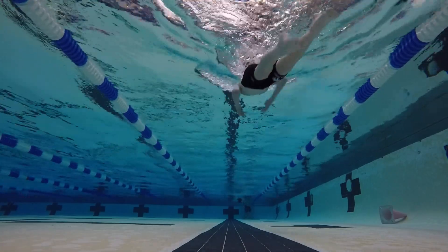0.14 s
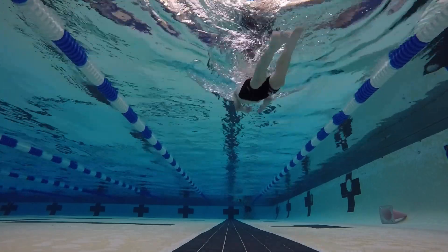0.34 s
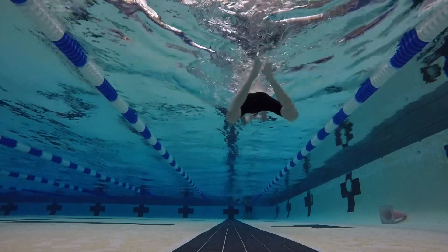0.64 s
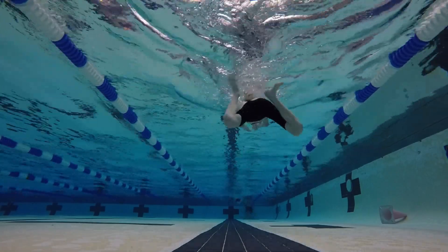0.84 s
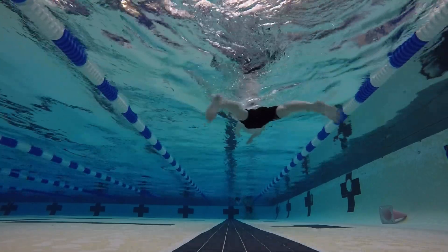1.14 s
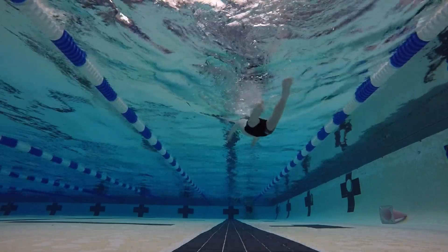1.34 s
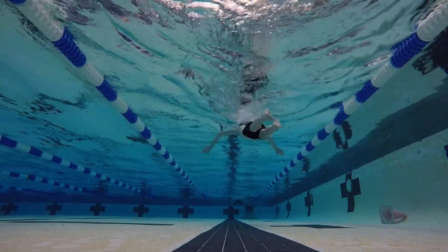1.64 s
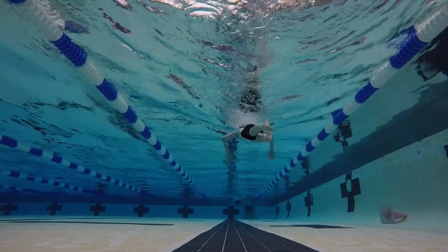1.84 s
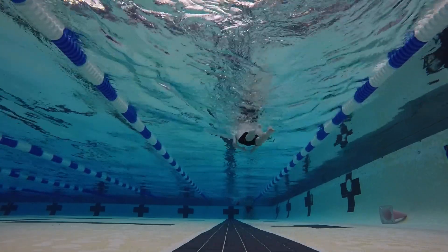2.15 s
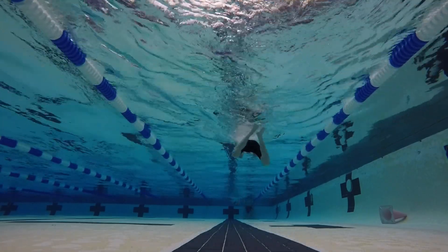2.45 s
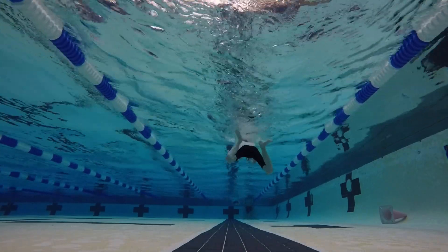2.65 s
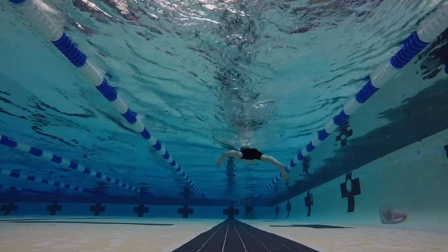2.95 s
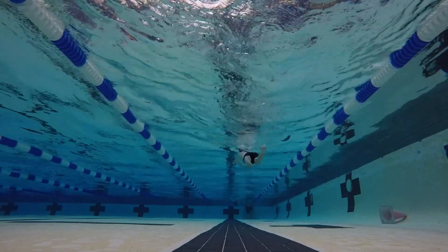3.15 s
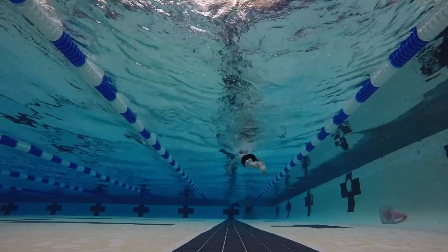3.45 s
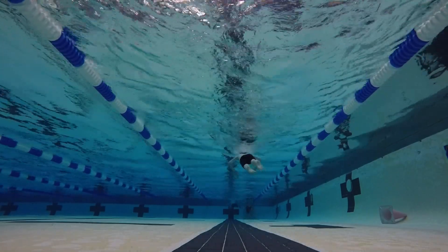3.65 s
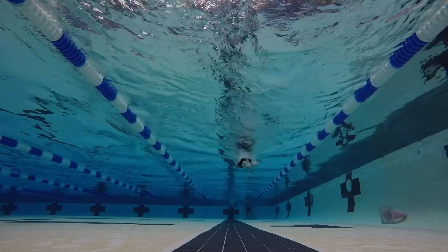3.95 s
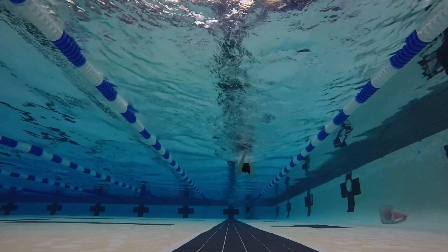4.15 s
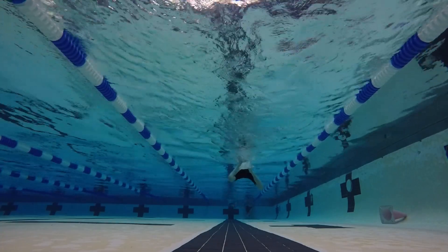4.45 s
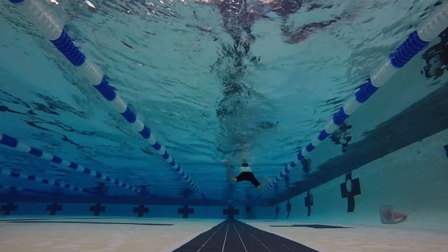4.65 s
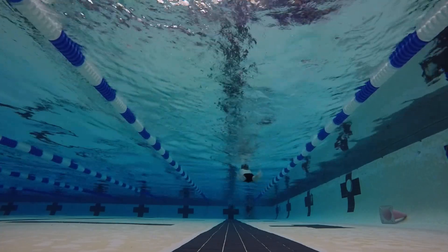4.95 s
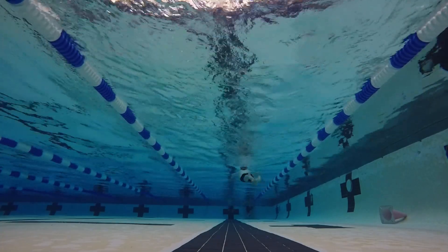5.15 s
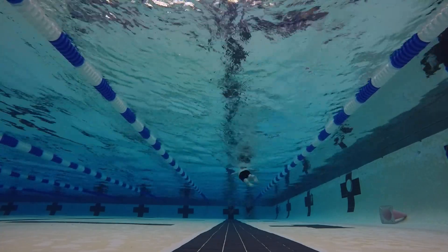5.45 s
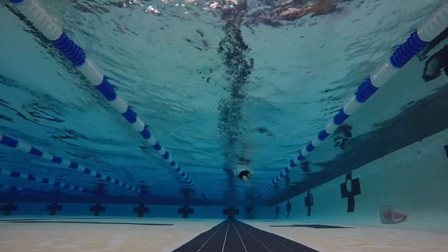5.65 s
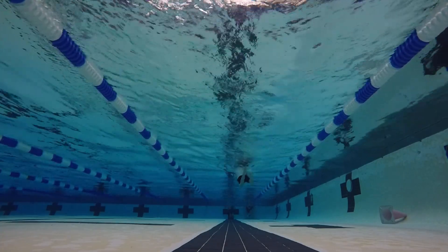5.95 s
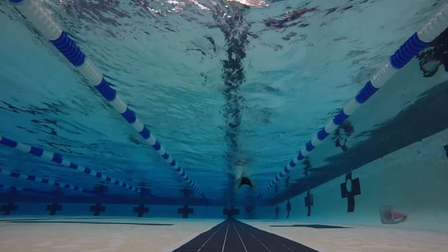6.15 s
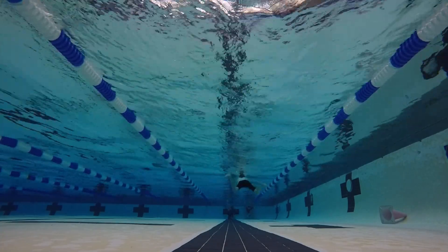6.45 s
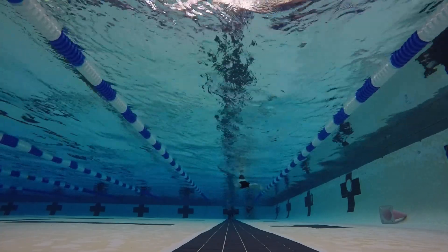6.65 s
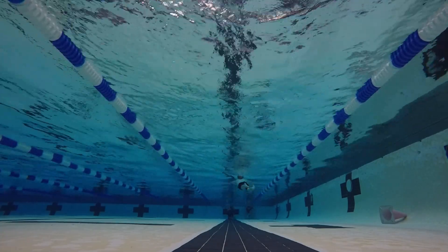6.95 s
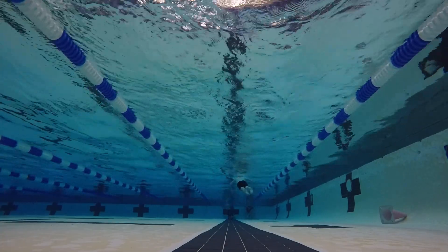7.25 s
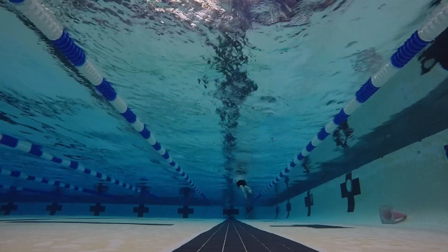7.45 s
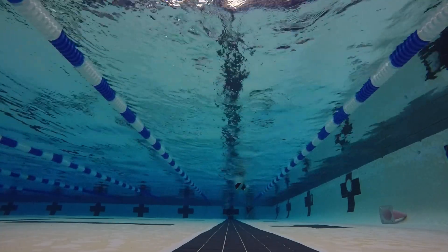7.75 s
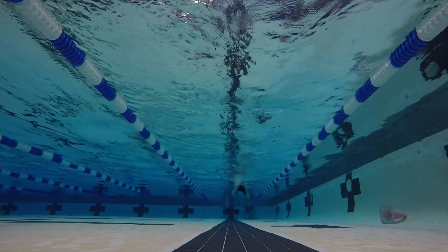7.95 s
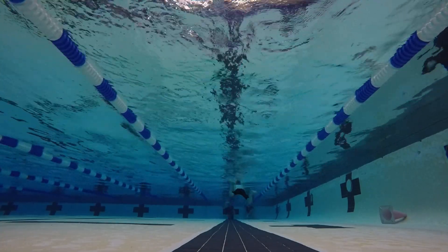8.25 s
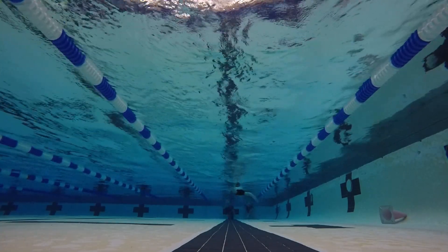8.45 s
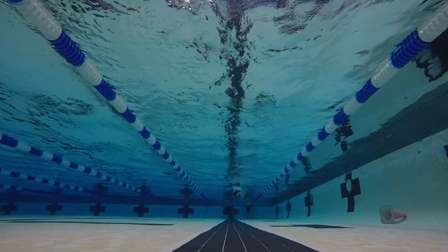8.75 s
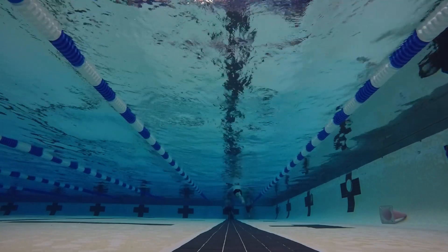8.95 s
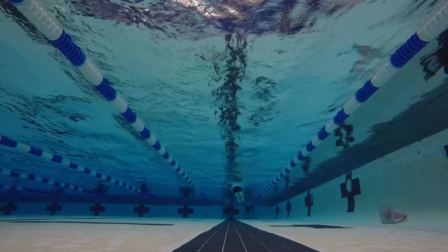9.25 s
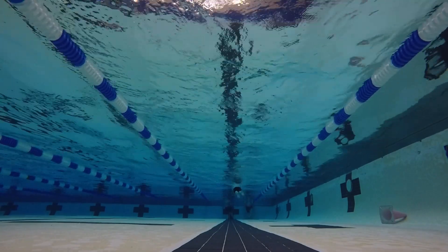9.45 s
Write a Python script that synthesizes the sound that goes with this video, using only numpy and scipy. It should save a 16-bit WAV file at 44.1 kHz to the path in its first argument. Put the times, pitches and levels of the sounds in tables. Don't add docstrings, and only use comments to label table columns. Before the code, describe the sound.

Muffled low-frequency thuds of air pockets, swelling bubble fizz and small ringing bubbles, with two sharp surface slaps later, heard from the pool floor.

```python
import sys
import numpy as np
from scipy import signal
from scipy.io import wavfile
from scipy.ndimage import uniform_filter1d

SR = 44100
rng = np.random.default_rng(int(sys.argv[2]) if len(sys.argv) > 2 else 0)


def put_to_file(sound):
    columns = np.atleast_2d(sound).T
    safe = np.clip(columns, -1, 1)
    whole_steps = np.round(safe * 32767)
    wavfile.write(sys.argv[1], SR, whole_steps.astype(np.int16))


def gain_from_decibels(decibels):
    exponent = np.asarray(decibels, float) / 20
    return 10 ** exponent


N = 423801
GRID_HZ = np.fft.rfftfreq(16384, 1 / SR)


def evened(x):
    return x / np.sqrt(np.mean(x ** 2) + 1e-20)


def read(points, hz):
    f, value = np.transpose(points)
    return np.interp(np.log(hz + 1), np.log(f + 1), value)


def add(mix, s, sound):
    part = mix[round(s * SR):][:len(sound)]
    part += sound[:len(part)]


def colour(x, gain_db):
    both_sides_db = np.r_[gain_db, gain_db[-2:0:-1]]
    log_gain = np.log(gain_from_decibels(np.maximum(both_sides_db, -100)))
    taps = np.fft.ifft(np.exp(np.conj(signal.hilbert(log_gain)))).real
    return signal.oaconvolve(x, taps[:len(gain_db)])[:len(x)]


def coloured_noise(tone_db):
    return evened(colour(rng.standard_normal(N), tone_db))


def bubble(hz, t60, rise, glide, length):
    t = np.arange(round(length * SR)) / SR
    turns = np.cumsum(hz * (1 + glide * np.exp(-t / rise / 1.14))) / SR
    shape = (1 - np.exp(-(t / rise) ** 2)) * gain_from_decibels(-60 * t / t60)
    return shape / shape.max() * np.sin(2 * np.pi * turns)


# (t/s, half length/s, small-bubble level/dB, larger-bubble level/dB),
# levels above the quiet between strokes
STROKES = [(0.0, 0.22, 1, 4), (0.61, 0.22, 0.5, 0.5), (0.926, 0.22, 2, 3.5), (1.424, 0.26, 1, 1),
           (1.648, 0.043, 3.5, -1), (1.8, 0.12, 3, 1.1), (2.38, 0.24, 1, 0.5), (2.755, 0.26, 2.5, 3),
           (3.446, 0.042, 2.5, 1), (3.65, 0.71, 1.5, 3.5), (4.687, 0.076, 2.5, 0.5), (5.337, .13, 4.5, 3.5),
           (5.53, 0.095, -0.5, 5.5), (5.723, 0.15, 1, 0.5), (6.483, 0.16, 3.5, 0.5),
           (6.916, 0.19, 0.7, 7.5), (7.317, 0.066, 3.5, -0.5), (7.44, 0.073, 4, 2), (7.794, .12, 1.5, -0.5),
           (8.47, 0.11, 3.5, -1), (8.681, 0.24, 0.5, 6.5), (9.55, 0.27, 0.5, 2.5)]
FAR_DB_PER_S = -0.1811


def effort_db():
    t = np.arange(0, N + 256, 256) / SR
    s, half, small, large = np.transpose(STROKES)
    bump = np.exp(-((t[:, None] - s) / np.maximum(half, .03)) ** 2)
    curves = (FAR_DB_PER_S * t, bump @ small, bump @ large)
    return [np.interp(np.arange(N) / SR, t, curve) for curve in curves]


# (f/Hz, level/dB per Hz)
ROLL_TONE = [(12, -68), (20, -19), (54, -2.5), (77, 0.5), (104, -7.5), (150, -23), (200, -49), (330, -120)]
# (f/Hz, level/dB per Hz)
WASH_TONE = [(60, -28.5), (130, -6), (180, -2.5), (260, -8), (420, -12.5), (600, -28)]
ROLL_DB, WASH_DB = -44, -67
START_DB, START_S = 8.5, 0.081
ROLL_SHARE = 0.43


def rumble():
    roll = coloured_noise(read(ROLL_TONE, GRID_HZ))
    wash = coloured_noise(read(WASH_TONE, GRID_HZ))
    far_db, _, large_db = effort_db()
    passing_db = START_DB * np.exp(-np.arange(N) / SR / START_S)
    level_db = ROLL_DB + passing_db + far_db + ROLL_SHARE * large_db
    return gain_from_decibels(level_db) * roll + gain_from_decibels(WASH_DB) * wash


# (f/Hz, width/Hz, level/dB)
HOUSING = [(1160, 180, 7.5), (1621, 54, -17), (1730, 520, 3.5), (2600, 77, 2.5), (3397, 105, -16),
           (3690, 670, 1.5), (5340, 1270, -7.5), (6800, 530, 5), (7890, 620, -22.5)]


def housing_db():
    return sum(db / (1 + (2 * (GRID_HZ - hz) / width) ** 2) for hz, width, db in HOUSING)


def swarm(low_hz, high_hz, per_s, cycles, spread_db, count):
    born = rng.random(N) < per_s / SR
    size = gain_from_decibels(spread_db * np.minimum(rng.exponential(1, N), 4.2)) * born
    kind, out = rng.integers(0, count, N), np.zeros(N)
    for k, hz in enumerate(np.geomspace(low_hz, high_hz, count)):
        ring = bubble(hz, cycles / hz, 1.42 / hz, -0.042, 1.2 * cycles / hz)
        ring = ring / np.linalg.norm(ring) / np.sqrt(hz)
        out += signal.oaconvolve(size * (kind == k), ring)[:N] * hz
    return evened(out)


def cloud(grains, share, tone_db):
    share = np.clip(share, 0, 1)
    blend = np.sqrt(share) * grains + np.sqrt(1 - share) * rng.standard_normal(N)
    return evened(colour(blend, tone_db))


# (f/Hz, level/dB per Hz)
FIZZ_TONE = [(530, -37.5), (900, -21.5), (1600, -4), (1930, 0), (3340, -5.5), (3820, -2), (5510, -15),
             (9000, -26), (15000, -40)]
# (f/Hz, level/dB per Hz)
GURGLE_TONE = [(220, -32), (380, -24.5), (450, -17.5), (716, -2.5), (796, -5.5), (920, -18.5), (1050, -31),
               (1360, -32), (2310, -120)]
SMALL_DB, LARGE_DB = -53.5, -59
LARGE_FAR = 3.64
NEAR_SHARE, FAR_SHARE, NEAR_S = 0.058, 0.15, 1.1
STROKE_SHARE = 0.027


def fizz():
    far_db, small_db, large_db = effort_db()
    ticks = swarm(1390, 8300, 700, 11.6, 2.5, count=8)
    grains = evened(swarm(1149, 7030, 800, 47, 3.23, count=14) + 0.53 * ticks)
    closeness = np.exp(-np.arange(N) / SR / NEAR_S)
    share = FAR_SHARE + STROKE_SHARE * small_db + NEAR_SHARE * closeness
    small = cloud(grains, share, read(FIZZ_TONE, GRID_HZ) + housing_db())
    large = cloud(swarm(466.5, 918, 200, 44.4, 1.14, count=7), 0.038, read(GURGLE_TONE, GRID_HZ))
    foam = swarm(6000, 10670, 200, 60, 2.0, count=8)

    gusts = uniform_filter1d(rng.standard_normal(N), size=700)
    gusts = evened(uniform_filter1d(gusts, size=500))
    small = evened(small * gain_from_decibels(1.13 * gusts))
    large = evened(large * gain_from_decibels(1.15 * gusts))

    fine = gain_from_decibels(SMALL_DB + far_db + small_db) * (small + gain_from_decibels(-26.5) * foam)
    return fine + gain_from_decibels(LARGE_DB + LARGE_FAR * far_db + large_db) * large


# (f/Hz, level/dB per Hz)
HISS_TONE = [(4410, -33), (7500, -2), (8800, -3), (9060, -8.5), (10400, -6), (15000, -14)]
HISS_DB = -68.5
WHINE_HZ = [
    5874,
    8570,
    13668,
]
# (width/Hz, level/dB)
WHINES = [
    (12, -90),
    (80, -85),
    (10, -99),
]


def electronics():
    tone = [(30, 1.9), (400, 8.3), (4000, 8.0)] + HISS_TONE[1:]
    out = gain_from_decibels(HISS_DB + 4) * coloured_noise(read(tone, GRID_HZ))
    for hz, (width, db) in zip(WHINE_HZ, WHINES):
        line_db = -20 * np.log10(1 + (2 * (GRID_HZ - hz) / width) ** 2)
        out = out + gain_from_decibels(db) * coloured_noise(line_db)
    return out


# (t/s, level/dB, f/Hz, t60/s)
THUMPS = [(0.096, -31.5, 79.8, 0.38), (0.469, -39, 93, 0.46), (0.948, -35, 90.5, 0.077),
          (1.37, -26, 63, 0.21), (1.641, -24.5, 69.3, 0.42), (1.891, -22.5, 73.3, 0.2),
          (2.165, -28.5, 67.7, 0.46), (2.454, -26, 76.3, 0.24), (2.827, -33, 75, 0.38),
          (3.158, -33.5, 90.4, 0.16), (3.279, -28, 81.6, 0.25), (4.045, -31.5, 69.6, 0.26),
          (4.64, -32, 82.7, 0.33), (5.096, -33.5, 79.4, 0.33), (5.575, -35.5, 80, 0.27),
          (5.881, -29.5, 71.8, .37), (6.054, -27, 78.7, 0.32), (6.4, -34, 78.2, 0.39),
          (6.606, -30, 61.2, 0.24), (6.755, -37, 69.3, 0.29), (7.152, -26.5, 87, 0.18),
          (7.499, -26.5, 68.5, 0.5), (7.703, -27.5, 64.9, 0.48), (8.228, -38, 84.8, 1),
          (8.558, -30, 61.5, .51), (8.629, -23.5, 61.3, 0.27), (9.127, -31, 80.3, 0.13),
          (9.372, -40, 89.8, 0.22)]
# (t/s, level/dB, f/Hz)
DISTANT = [(0.019, -48, 73.4), (0.386, -34, 76.7), (0.877, -34.5, 77), (2.926, -39.5, 86.7),
           (3.885, -33, 62.2), (4.309, -37, 74), (4.739, -38.5, 79.2), (5.656, -34, 71.7), (5.831, -37, 65),
           (6.279, -38, 79.5), (6.531, -34, 84.3), (6.671, -34, 69), (6.971, -41, 92), (7.288, -38, 82),
           (9.475, -35, 66)]
# (t/s, level/dB, f/Hz)
GLUGS = [(1.37, -38.5, 117.7), (2.18, -41.5, 125.4), (2.899, -46, 124.6), (5.658, -39.5, 117.5),
         (6.74, -42.5, 127), (7.257, -40.5, 120), (9.349, -43, 119), (9.278, -54, 189)]
DISTANT_T60_S, GLUG_CYCLES = 0.25, 33


def thumps():
    out = np.zeros(N)
    distant = [row + (DISTANT_T60_S,) for row in DISTANT]
    glugs = [(s, db, hz, GLUG_CYCLES / hz) for s, db, hz in GLUGS]
    for s, db, hz, t60 in THUMPS + distant + glugs:
        pocket = bubble(hz, max(t60, .05), 0.024, 0.1, 0.65)
        add(out, max(s - .012, 0), gain_from_decibels(db - 2.5) * pocket)
    return out


# (t/s, punch level/dB, ring f/Hz, ring level/dB, ring length/s)
KICKS = [(0.197, -30.5, 54.7, -33.5, .06), (0.783, -43, 57, -27, 0.034), (1.906, -23.5, 51.6, -34.5, 0.13),
         (2.713, -36, 47.5, -27, 0.074), (3.352, -21, 56.6, -28.5, 0.14), (3.624, -22, 50.8, -28.5, 0.17),
         (4.392, -33.5, 44, -33.5, 0.082), (5.343, -27, 54, -28, 0.12), (6.17, -41, 49.7, -31.5, 0.031),
         (7.406, -27.5, 58.4, -25.5, 0.05), (8.028, -23.5, 50, -30, 0.14), (8.926, -23, 51.2, -27.5, .13),
         (9.172, -34, 56.7, -33, 0.096)]
PUNCH_HZ = 64.5


def kicks():
    out, t = np.zeros(N), np.arange(SR // 2) / SR
    after = t - .04
    for s, punch_db, hz, ring_db, length in KICKS:
        punch = np.exp(-(after / 0.013) ** 2) * np.sin(2 * np.pi * PUNCH_HZ * after + 0.48)
        swell = 1 - np.exp(-(t / 0.053) ** 3)
        breakup = np.exp(-(np.maximum(after, 0) / length) ** 3.6)
        ring = swell * breakup * np.sin(2 * np.pi * hz * (after + 0.45 * after ** 2) + 0.86)
        add(out, s - .021, gain_from_decibels(punch_db) * punch + gain_from_decibels(ring_db) * ring)
    return out


# (t/s, level/dB, f/Hz)
PINGS = [(0.3865, -32, 2730), (0.4433, -25.5, 3890), (0.508, -35, 3020), (0.703, -33, 2540),
         (0.5329, -30, 3890), (0.6394, -34, 2690), (0.8063, -33.5, 2540), (0.8865, -34, 2600),
         (0.9937, -32, 4000), (1.1694, -33, 2240), (1.316, -32.5, 3700), (1.3967, -37, 2120),
         (1.799, -40, 2300), (1.7645, -30.5, 2005), (2.155, -34.5, 2150), (3.0525, -37, 2690),
         (3.283, -27.5, 2420), (3.7973, -34, 3820), (3.8192, -34, 2770), (4.018, -29.5, 2610),
         (4.8575, -30.5, 2370), (5.1811, -33.5, 1950), (5.215, -31, 2370), (6.2751, -40, 1890),
         (6.298, -34, 3700), (7.2649, -36.5, 1860), (7.279, -36, 3560), (7.3076, -31, 1920),
         (7.322, -40, 2720), (8.4188, -37, 1890)]
# (t/s, level/dB, f/Hz)
TINY = [(0.413, -41, 5260), (0.5471, -48, 6660), (3.3801, -44, 9900), (6.2546, -46, 6770),
        (6.3848, -47.5, 6740)]
# (t/s, level/dB, f/Hz)
SPRAY = [(6.8676, -37, 4400), (6.873, -31, 4060), (6.8737, -27.5, 1830), (6.877, -33.5, 6800),
         (6.879, -32.5, 2600), (6.898, -38, 1920), (6.916, -35, 3740), (9.27, -33, 2670),
         (9.279, -33, 3900), (9.283, -33, 1390), (9.305, -37, 3900)]
# (t/s, level/dB, f/Hz)
MORE_PINGS = [(0.478, -34.5, 1860), (1.622, -34, 2220), (1.682, -35, 1930), (1.727, -38, 1960),
              (2.7112, -46, 2090), (2.789, -33.5, 2500), (2.9766, -34, 3690), (3.034, -36, 2240),
              (3.286, -34.5, 2220), (4.859, -33, 3000), (5.701, -37, 1980), (5.828, -37.5, 1900),
              (7.285, -39, 1900), (7.3, -42, 1450), (7.338, -35, 2740), (7.344, -39, 1830), (7.361, -38, 1800),
              (8.447, -35.5, 2830)]
# (t/s, level/dB, f/Hz)
BLUPS = [(0.419, -36, 544), (0.531, -38, 722), (0.751, -37, 694), (1.451, -43, 720), (2.467, -36, 753),
         (3.367, -32.5, 727), (3.457, -39, 780), (4.219, -31, 1210), (4.69, -34, 731), (5.552, -41, 740),
         (7.476, -40, 695), (8.293, -29.5, 720), (9.279, -37.5, 753)]
PING_CYCLES, BLUP_CYCLES = 56, 77


def pings():
    small, large, echo = np.zeros((3, N))
    for s, db, hz in PINGS + TINY + SPRAY + MORE_PINGS:
        add(small, s, gain_from_decibels(db - 7) * bubble(hz, PING_CYCLES / hz, 1.55 / hz, -0.0095, .1))
    for s, db, hz in BLUPS:
        add(large, s, gain_from_decibels(db - 9.5) * bubble(hz, BLUP_CYCLES / hz, 1.0 / hz, -0.044, .25))
    add(echo, .0048, gain_from_decibels(-5.5) * small)
    return small + echo + large


# (t/s, level/dB, low share/dB, treble share/dB, top share/dB)
SNAPS = [(0.4423, -30, -41, -6, -22), (0.6643, -35, -17, -20, -37), (0.9932, -32.5, -11, -18, -17),
         (1.0464, -44, -11, -18, -16), (1.137, -37, -10, -22, -27), (1.6775, -38, 1.5, -28, -26),
         (2.8077, -38.5, -10, -35, -23), (4.858, -39.5, -15, -36, -38), (5.397, -43, 2, -41, -27),
         (6.297, -44, -20, -28, -31)]
# (t/s, level/dB, low share/dB, treble share/dB, t60/s)
SLAPS = [
    (6.8729, -32.5, -0.5, -15, 0.18),
    (9.2689, -31.5, 0, -13.5, 0.26),
]
SNAP_T60_S, SLAP_TOP_DB = 0.037, -31.5


def slaps():
    out, t = np.zeros(N), np.arange(SR // 4) / SR
    rows = [row + (SNAP_T60_S,) for row in SNAPS]
    rows += [row[:-1] + (SLAP_TOP_DB, row[-1]) for row in SLAPS]
    noise = rng.standard_normal((len(rows), 2, len(t)))
    sweep_hz = 1500 * 10 ** (t / .0025)
    crack = np.sin(2 * np.pi * np.cumsum(sweep_hz) / SR)
    crack = crack * np.sqrt(sweep_hz / 4000) * (sweep_hz < 15000)
    for (s, db, low_db, treble_db, top_db, t60), (puff, clumps) in zip(rows, noise):
        tone = [(300, low_db - 34), (950, low_db - 18), (1400, low_db), (2100, 5.4 * low_db),
                (2800, -0.63), (4600, -0.04), (5500, treble_db), (7200, treble_db),
                (10500, top_db), (16000, top_db - 10)]
        fade_db = -60 * t / np.clip(t60, .01, .4)
        shower = puff * gain_from_decibels(1.84 * evened(uniform_filter1d(clumps, size=90)))
        shower *= gain_from_decibels(1.7 * fade_db) + 1.02 * gain_from_decibels(fade_db)
        shower *= 1 - np.exp(-t / (0.0097 * t60 + 0.0017))
        burst = shower + 1.3 * np.sqrt(0.043 / t60) * crack
        burst = colour(burst, read(tone, GRID_HZ) + housing_db())
        add(out, s - .0002, gain_from_decibels(db + 2.0) * burst / abs(burst).max())
    return out


def scene():
    return (rumble() + fizz() + thumps() + kicks() + pings() + slaps())[None]


def band_limit(x):
    return signal.sosfilt(signal.butter(12, 15940, fs=SR, output="sos"), x)


def record(dry):
    edge = signal.firwin(2047, 15330, window=("kaiser", 9), fs=SR)  # low-pass, Hz
    mix = signal.oaconvolve(dry + electronics(), edge[None], "same")
    return band_limit(mix)


dry = scene()
out = record(dry)
put_to_file(out)
```